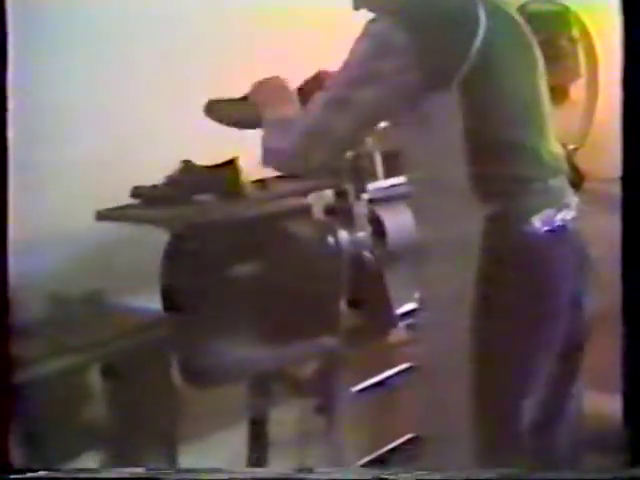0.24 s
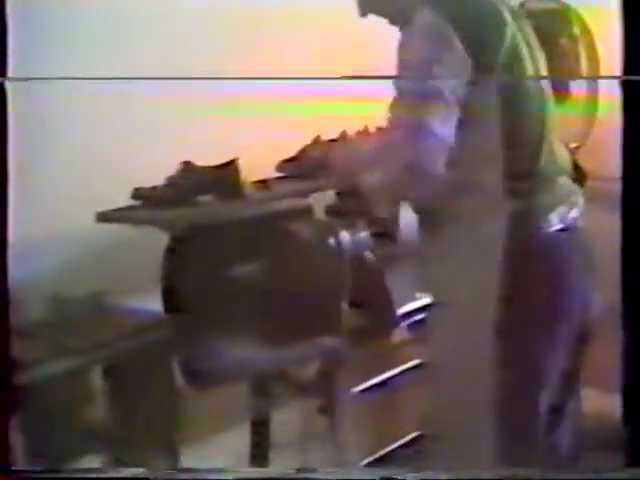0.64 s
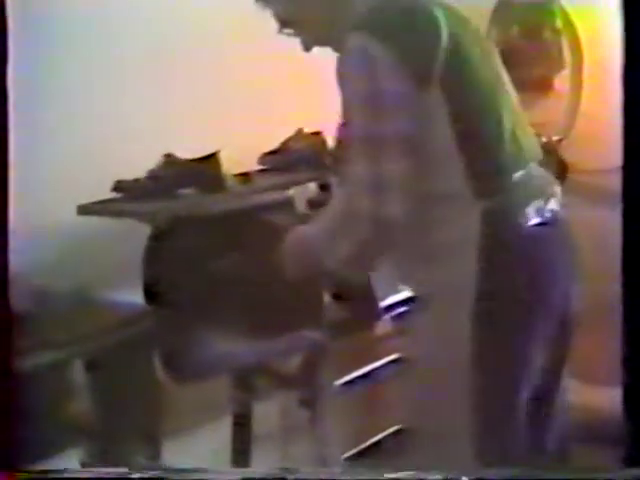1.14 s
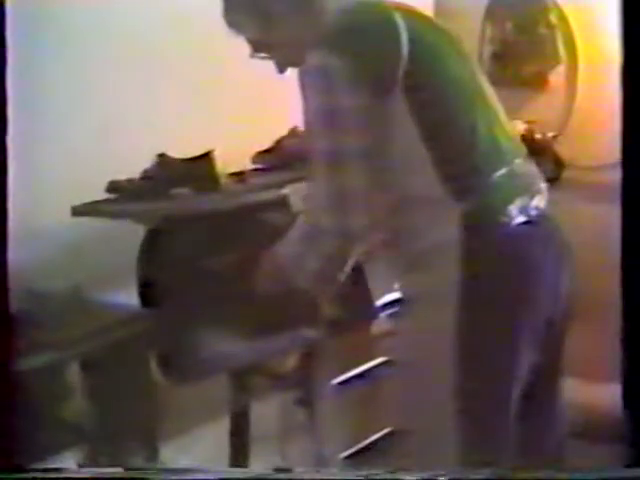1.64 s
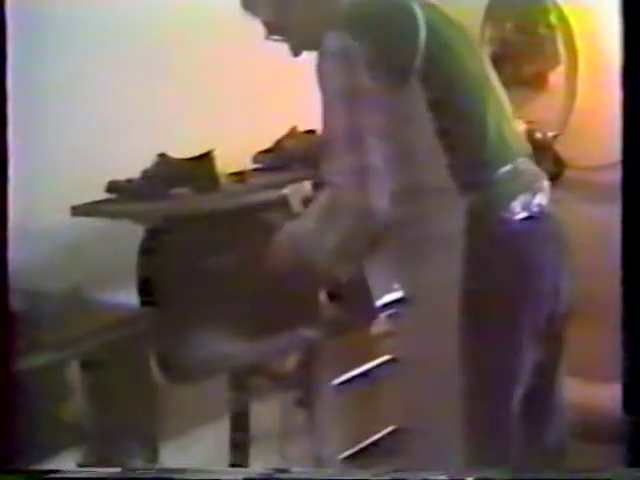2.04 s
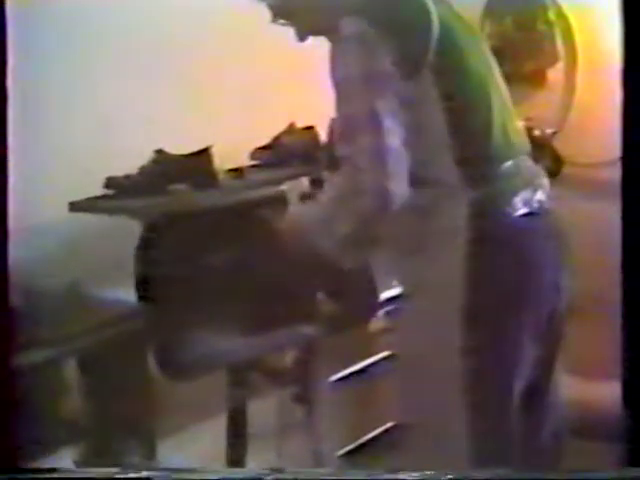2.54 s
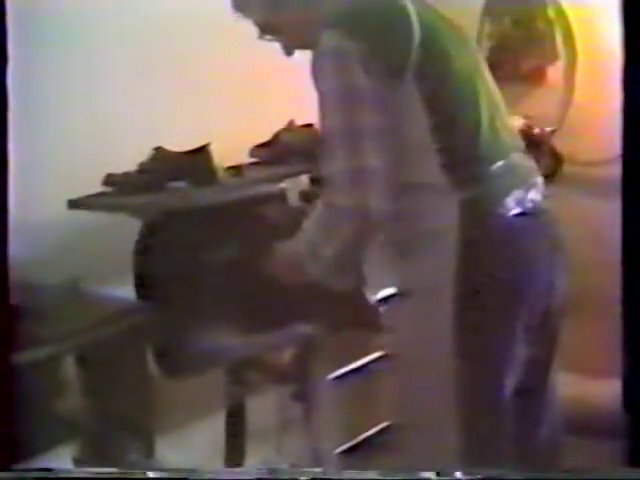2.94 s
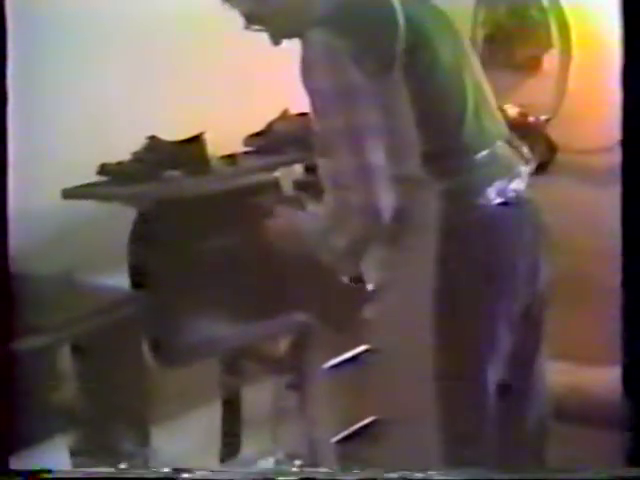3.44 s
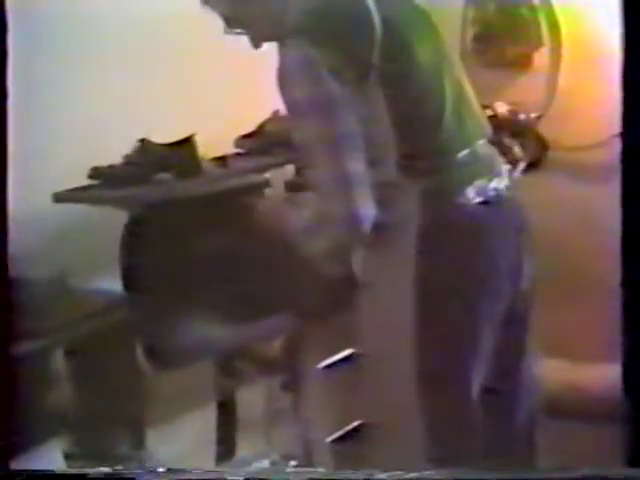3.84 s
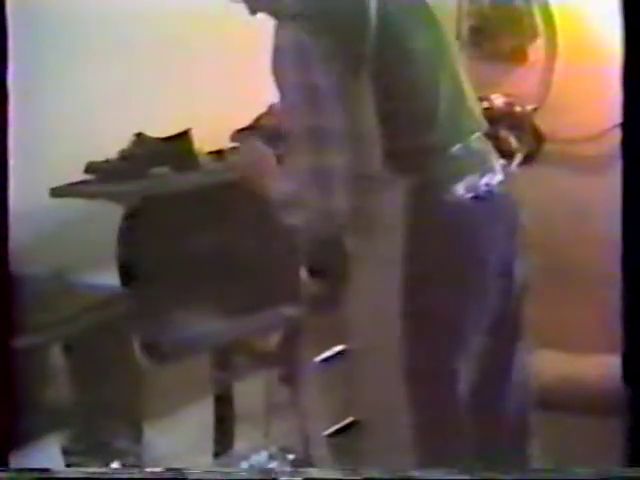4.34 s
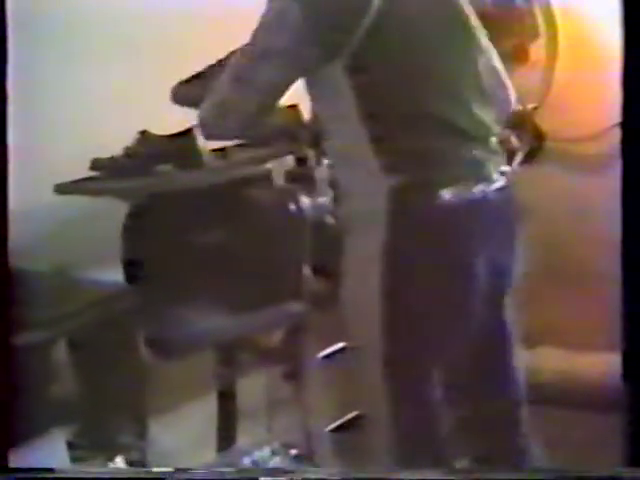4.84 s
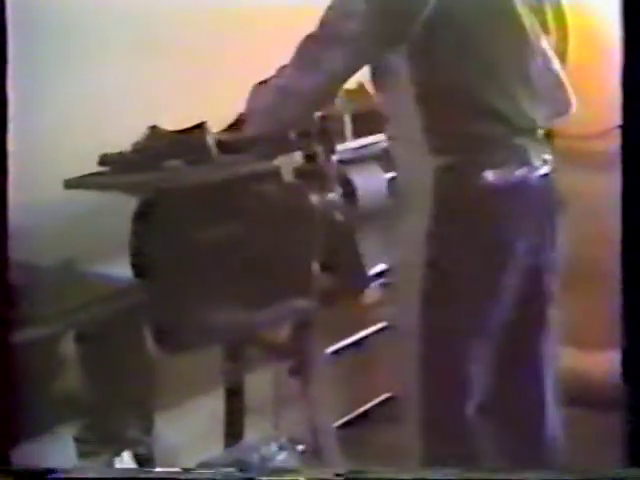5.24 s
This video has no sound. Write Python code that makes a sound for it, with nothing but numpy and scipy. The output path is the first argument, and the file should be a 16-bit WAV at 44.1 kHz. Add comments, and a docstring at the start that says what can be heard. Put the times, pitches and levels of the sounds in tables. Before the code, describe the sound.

A shoe finishing machine is already running and never stops. Its fan gives a strong, nearly pure hum around 259 Hz, slightly wavering, over much weaker shaft tones. Around it sit low duct air at 250-400 Hz, a hollow mid whir coloured by a metal hood, a fine gritty rasp at 2-6 kHz, and a sanding-belt swish that pulses about four to five times a second. Shoe pushes swell the noise modestly, peaking near 1.3, 1.6, 2.1 and 3.0 s. The pitch sags to about 251 Hz from 1.8 s, recovers by 2.5-3.0, drops again to 252 around 3.3, and returns by 4.6. Thin metal sings faintly. At about 5.25 s a shoe meets the shelf: two nearly merged scuffing knocks, lighter contacts after, a short dull tail. The machine continues to the end, about 5.6 s. Close, lo-fi tape sound on the left, with faint hiss and high whine; the right is nearly empty.

```python
"""A shoe finishing machine hums in a small workshop: a fan's near-pure blade tone amid weak shaft and wheel tones.
Shaped noises give the duct's air, the wheels' whir, the rasp of grit and the swish of a sanding belt.
A shoe is pressed to the wheel in four pushes, the pitch sags twice, thin metal sings in narrow noise bands.
Decaying scuffs set the shoe down on a shelf. A tape camera puts it all on the left, with hiss and whine;
the right holds only faint crosstalk and its own low noise."""
import sys
import numpy as np
from scipy import signal
from scipy.fft import rfft, irfft
from scipy.io import wavfile

SR = 44100
rng = np.random.default_rng(int(sys.argv[2]) if len(sys.argv) > 2 else 0)


def to_wav(s):
    """Save 16-bit WAV."""
    ch = np.atleast_2d(s).T  # columns
    pcm = np.round(np.clip(ch, -1, 1) * 32767)  # PCM
    wavfile.write(sys.argv[1], SR, pcm.astype(np.int16))


N = 242991
TIME = np.arange(N) / SR
FREQS = np.fft.rfftfreq(N, 1 / SR)

BLADES = 8
SHAFT_TURNS_PER_BELT_LAP = 7.045
EDGE_HZ = 15950  # top of the audible band

# Levels in these tables are set ahead of the final channel gain.
# motor speed, heard as the fan's blade tone: t/s, f/Hz
BLADE_PITCH = [(0.14, 258.1), (0.27, 259.5), (1.19, 258.8), (1.25, 257.3), (1.53, 257.2), (1.82, 250.9),
               (2.2, 251.4), (2.42, 253.5), (2.49, 257.9), (2.72, 259.1), (2.97, 260), (3.28, 252.6),
               (3.6, 252.2), (3.66, 254.2), (4.3, 253.8), (4.39, 252.6), (4.62, 259.6), (5.38, 259.9)]
# loudness of the blade tone before its random sway: t/s, level/dB
BLADE_TONE_LEVEL = [(0.05, -18), (1.23, -19.5), (1.27, -22.5), (1.5, -18), (1.56, -19.5), (2.49, -18),
                    (2.52, -20), (3.06, -21), (3.14, -18), (4.46, -18.5), (4.51, -20), (4.9, -20),
                    (4.95, -16.5), (5.05, -20.5), (5.11, -17.5), (5.35, -21.5), (5.43, -17.5),
                    (5.46, -21.5)]
# random sway of the blade tone: depth/dB, rate/(changes per s), growth of depth with pitch/(dB per Hz),
# growth of depth with grinding/(dB per dB)
BLADE_SWAY = (.4, 13, 0.67, 1.0)
# shaft tones, fractional ones from belt-driven wheels, before a shared trim: multiple of shaft speed, level/dB
SHAFT_TONES = [(4, -37.5), (5, -34.5), (6, -33.5), (7, -38.5), (9, -22), (10, -36), (16, -33.5),
               (21.16, -29), (24, -33.5), (24.4, -32), (27.1, -36.5), (27.33, -32), (35.86, -42.5),
               (41.4, -32.5), (49.94, -38.5), (54.37, -46.5), (54.87, -35)]
# out-of-round pulleys that wobble the pitch: multiple of shaft speed, phase swing of the blade tone/rad
PULLEY_WOBBLE = [(.206, .19), (.284, .11)]
# pushes of the shoe against the wheel: hardest at t/s, build-up/s, release/s, grinding level/dB
SHOE_PRESSES = [(1.3, .45, 0.45, 2.5), (1.62, .13, 0.22, 3.5), (2.1, .18, .25, 1.5),
                (2.98, 0.46, 0.51, 2.5)]
# loudness laws: free-running level/dB, gain from grinding/(dB per dB), growth with blade pitch/(dB per Hz)
DUCT_LOUDNESS = (-33, 1.22, .22)
WHIR_LOUDNESS = (-33.5, 0.97, .08)
RASP_LOUDNESS = (-37, 0.99, .11)
# noise colours, relative density: f/Hz, level/dB
DUCT_COLOUR = [(20, -18), (50, -30.5), (105, -24), (145, -14), (205, -12), (250, -4), (280, -3.5),
               (305, -2.5), (330, 1.5), (372, -0.5), (400, -13.5), (480, -13.5), (800, -62.5)]
WHIR_COLOUR = [(150, -42), (380, -5), (480, -4.5), (600, -0.5), (800, -1.5), (1030, 0), (1120, -4),
               (1600, -5), (2200, -7.5), (3200, -13.5), (6000, -38), (7600, -70)]
RASP_COLOUR = [(600, -28), (1600, -15.5), (2300, -2), (2850, -4), (3350, 0), (4000, -1.5), (4500, -0.5),
               (5300, -1.5), (6400, -7), (6950, -14.5), (7800, -37.5), (9000, -76)]
BELT_COLOUR = [(2500, -34), (4000, -1.5), (4800, -2), (5500, 2), (6000, -0.5), (6550, -2), (7000, -16),
               (7500, -17.5), (7900, -42), (9000, -74.5)]
SCUFF_COLOUR = [(200, -22), (440, -1.5), (850, .5), (1400, -3), (3200, -4), (4800, -8), (6400, -14),
                (7700, -40), (9000, -70)]
TAPE_COLOUR = [(20, -3.5), (7000, -0.5), (9500, -2), (11500, -6), (13000, -13), (14200, -17), (15100, -7),
               (15700, 1.5)]
# uneven wear around the sanding belt: share of one lap, hiss level/dB
BELT_WEAR_DB = [(0, 3), (.13, -3), (.33, -4), (.46, -2.2), (.56, -4.5), (.68, 2.6), (.81, -2), (.9, 5.4),
                (1, 3)]
# ringing of the sheet-metal hood: f/Hz, width/Hz, boost/dB
HOOD_RINGS = [(573, 49, 5), (693, 51, 2.5), (734, 30, -0.5), (860, 27, 0), (1360, 49, 1.5), (1416, 37, 6),
              (1592, 18, 3.5), (1870, 69, 2), (2370, 33, -1)]
# thin metal that sings: f/Hz, width/Hz, level/dB
SINGING_METAL = [(882, 16, -46), (1341, 34, -48.5), (1768, 50, -52.5)]
# contacts of the shoe with the shelf: full at t/s, level/dB, rise/s, 60 dB decay time/s
SHOE_CONTACTS = [(5.246, -24, 0.0095, 0.36), (5.254, -25.5, 0.0048, 0.52), (5.277, -34, 0.0079, 0.4),
                 (5.308, -39.5, .005, 0.52)]
# mains hum and the camera's electronic whine: f/Hz, level/dB
CAMERA_WHINE = [(60, -64), (7912, -76), (8631, -79), (9351, -77), (10070, -77), (10789, -79), (11509, -80),
                (12228, -85), (15734, -62.5)]


def from_db(db):
    """Decibels to gain."""
    return 10 ** (np.asarray(db) / 20)


def unit(x):
    """Scales to an rms of one."""
    return x / np.sqrt(np.mean(x ** 2) + 1e-20)


def follow(table):
    """The second column of a timed curve, drawn as straight lines at every sample."""
    t, value = np.transpose(table)
    return np.interp(TIME, t, value)


def filtered_noise(gain):
    """White noise weighted by a gain at each frequency."""
    return irfft(rfft(rng.standard_normal(N)) * gain, N)


def noise(colour, boost_db=0):
    """Noise of rms one, its colour drawn on a log-frequency axis."""
    hz, db = np.transpose(colour)
    colour_db = np.interp(np.log(FREQS + 1), np.log(hz), db)
    return unit(filtered_noise(from_db(colour_db + boost_db)))


def wander(rate_hz):
    """Slow random drift of rms one, changing up to about rate_hz times a second."""
    return unit(filtered_noise(np.exp(-(FREQS / rate_hz) ** 2)))


def resonance(hz, width):
    """A peak of one at hz that falls away over its width in Hz."""
    return 1 / (1 + (2 * (FREQS - hz) / width) ** 2)


def hood_db():
    """The boost or cut that the hood's resonances give each frequency."""
    return sum(db * resonance(hz, width) for hz, width, db in HOOD_RINGS)


def loudness(law, grind_db, blade_hz):
    """A machine noise's level in dB: friction and speed both drive it."""
    free_db, grind_share, db_per_hz = law
    return free_db + grind_share * grind_db + db_per_hz * (blade_hz - blade_hz.mean())


def duct(duct_db, gust_db=1.0, gust_rate=14):
    """Air rushes through the extractor duct as coloured noise, its level gusting at random."""
    return from_db(duct_db + gust_db * wander(gust_rate)) * noise(DUCT_COLOUR)


def shoe_on_shelf(dull_hz=1300, ring=1.2, ring_db=-5):
    """Each contact is a short scuff; shelf and room hold a duller copy of it longer."""
    dulling_db = 20 * np.log10(1 + (FREQS / dull_hz) ** 2)
    out = np.zeros(N)
    for t, db, rise, t60 in SHOE_CONTACTS:
        age = np.maximum(TIME - t + rise, 0)
        onset = np.minimum(age / rise, 1)
        fall = np.log(1000) * age / t60
        scuff = np.exp(-fall) * noise(SCUFF_COLOUR)
        tail = np.exp(-fall / ring) * noise(SCUFF_COLOUR, hood_db() - dulling_db)
        out += from_db(db) * onset * (scuff + from_db(ring_db) * tail)
    return out


def singing(blade_hz, grind_db, db_per_hz=0.8, grind_share=.6, swell_db=1.5):
    """Narrow metal resonances swell and fade; grinding excites them and a slower shaft quiets them."""
    drive_db = db_per_hz * (blade_hz - blade_hz.mean()) + grind_share * grind_db
    out = np.zeros(N)
    for hz, width, db in SINGING_METAL:
        ring = filtered_noise(resonance(hz, width))
        out += from_db(db) * unit(ring * from_db(drive_db + swell_db * wander(8)))
    return out


def belt(turns, rasp_db, level_db=-39.0, grind_share=0.31, uneven_db=1.5):
    """The sanding belt hisses, rising and falling with its worn patches on every lap."""
    lap = turns / SHAFT_TURNS_PER_BELT_LAP % 1
    wear_db = np.interp(lap, *np.transpose(BELT_WEAR_DB))
    grind_db = grind_share * (rasp_db - rasp_db.mean())
    return from_db(level_db + wear_db + grind_db + uneven_db * wander(27)) * noise(BELT_COLOUR)


def grinding(hand_db=0.46, hand_rate=10):
    """Each push adds dB in a straight build-up and release; the pressure wavers a little throughout."""
    push_db = sum(db * np.interp(TIME, [t - build, t, t + release], [0, 1, 0])
                  for t, build, release, db in SHOE_PRESSES)
    return push_db + hand_db * wander(hand_rate)


def wheels(turns, whir_db, rasp_db, wobble_db=0.67, chatter_db=0.73, grit_db=1.57):
    """Whir rings inside the hood and grit rasps; a slightly untrue wheel rubs harder once a turn."""
    contact = from_db(wobble_db * np.sin(2 * np.pi * turns) + chatter_db * wander(36))
    whir = from_db(whir_db) * noise(WHIR_COLOUR, hood_db())
    rasp = from_db(rasp_db + grit_db * wander(370)) * noise(RASP_COLOUR)
    return contact * (whir + rasp)


def blade_level(blade_hz, grind_db):
    """The blade tone's level in dB; its random sway deepens with grinding and shrinks as the motor slows."""
    depth_db, rate, db_per_hz, grind_share = BLADE_SWAY
    unrest = from_db(db_per_hz * (blade_hz - blade_hz.mean()) + grind_share * grind_db)
    return follow(BLADE_TONE_LEVEL) + depth_db * unrest * wander(rate)


def fan(turns, level_db, rasp_db, flutter=0.046, jitter=0.046, throb=0.046, waver=0.31):
    """Passing blades make a near-pure tone among weak shaft tones; its level shakes more when the grit bites."""
    angle = 2 * np.pi * turns
    bite = from_db(1.6 * (rasp_db - rasp_db.mean()))
    wobble = sum(swing * np.sin(k * angle + 2 * np.pi * rng.random() + 0.58 * wander(2.8))
                 for k, swing in PULLEY_WOBBLE)
    shake = 1 + bite * (flutter * wander(45) - throb * np.sin(angle))
    blade = from_db(level_db) * shake * np.sin(BLADES * angle + wobble + jitter * wander(16))
    others = np.zeros(N)
    for k, db in SHAFT_TONES:
        phase = 2 * np.pi * rng.random() + 0.5 * wander(4.4)
        others += from_db(db) * (1 + waver * wander(4)) * np.sin(k * angle + phase)
    return np.sqrt(2) * (blade + from_db(-19.5) * others)


def scene():
    """One shaft drives fan, wheels and belt; speed and grinding shape their noises together."""
    blade_hz = follow(BLADE_PITCH)
    turns = np.cumsum(blade_hz) / BLADES / SR  # shaft turns so far
    grind_db = grinding()
    duct_db = loudness(DUCT_LOUDNESS, grind_db, blade_hz)
    whir_db = loudness(WHIR_LOUDNESS, grind_db, blade_hz)
    rasp_db = loudness(RASP_LOUDNESS, grind_db, blade_hz)
    sound = duct(duct_db) + shoe_on_shelf() + singing(blade_hz, grind_db)
    sound += belt(turns, rasp_db) + wheels(turns, whir_db, rasp_db)
    sound += fan(turns, blade_level(blade_hz, grind_db), rasp_db)
    return np.array([sound, sound])


def record(dry):
    """Tape adds hiss and whine on the left; the right gets faint, mostly treble crosstalk and idle noise."""
    whine = np.sqrt(2) * sum(from_db(db) * np.sin(2 * np.pi * hz * TIME) for hz, db in CAMERA_WHINE)
    track = dry[0] + from_db(-52.5) * noise(TAPE_COLOUR) + whine
    # the sample-to-sample difference leans to the treble
    crosstalk = from_db(-32.5) * np.diff(track, prepend=track[0]) + from_db(-58.0) * track
    idle_colour = [(20, 26.5), (60, 33.5), (150, 13.5), (500, -3.5), (6000, -3.5), (8000, -17), (15000, -12.5)]
    idle = from_db(-59) * noise(idle_colour)
    both = np.array([from_db(6) * track, crosstalk + idle])
    lowpass = signal.firwin(1023, EDGE_HZ, window=("kaiser", 9), fs=SR)
    return signal.oaconvolve(both, lowpass[None], "same")


dry = scene()
out = record(dry)
to_wav(out)
```